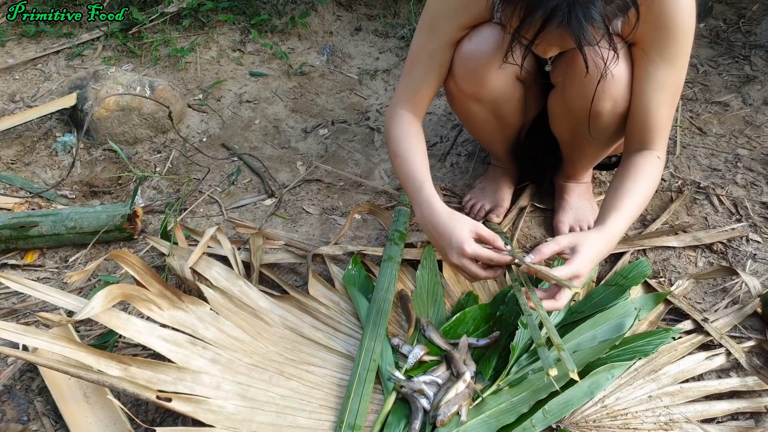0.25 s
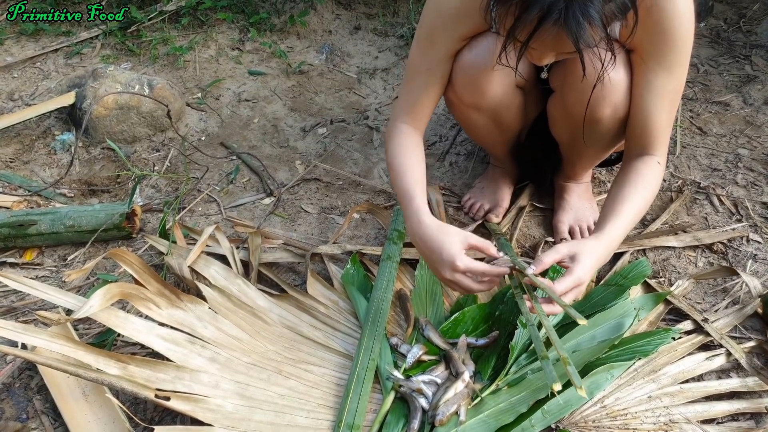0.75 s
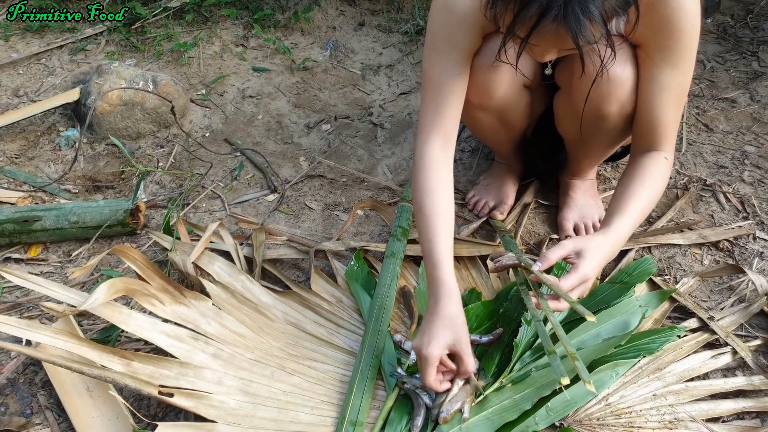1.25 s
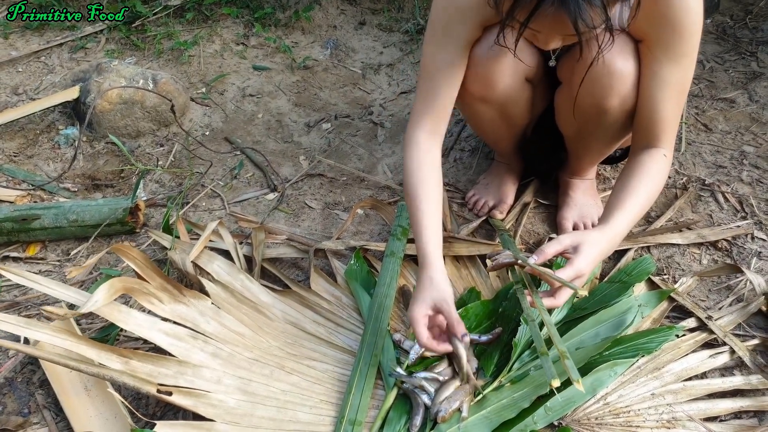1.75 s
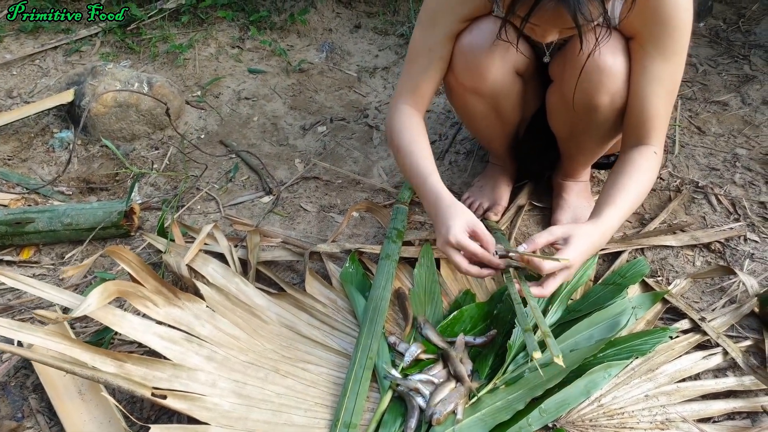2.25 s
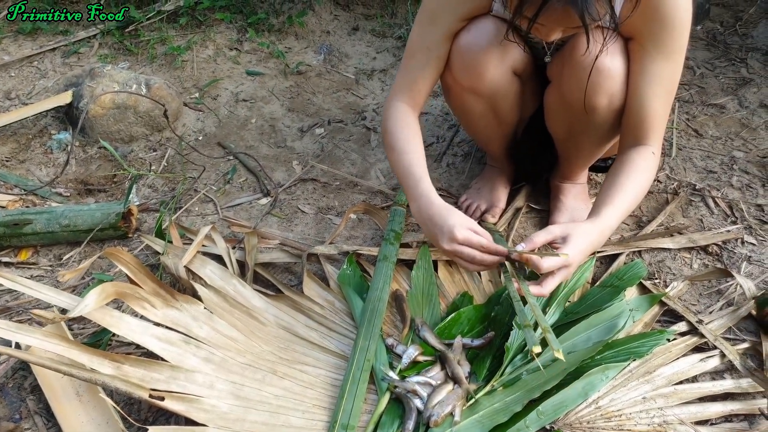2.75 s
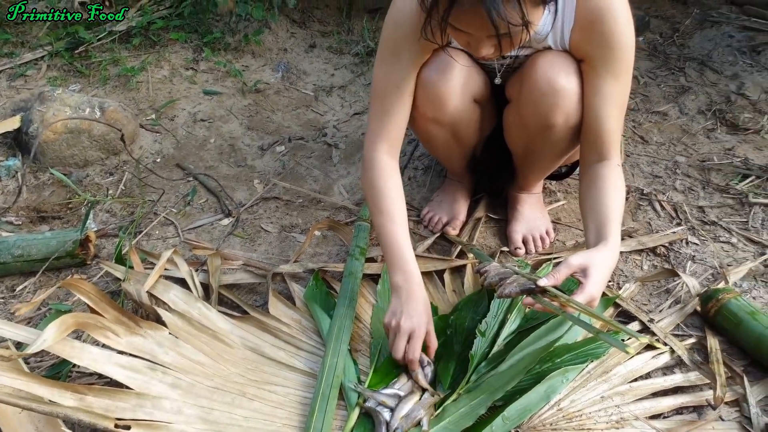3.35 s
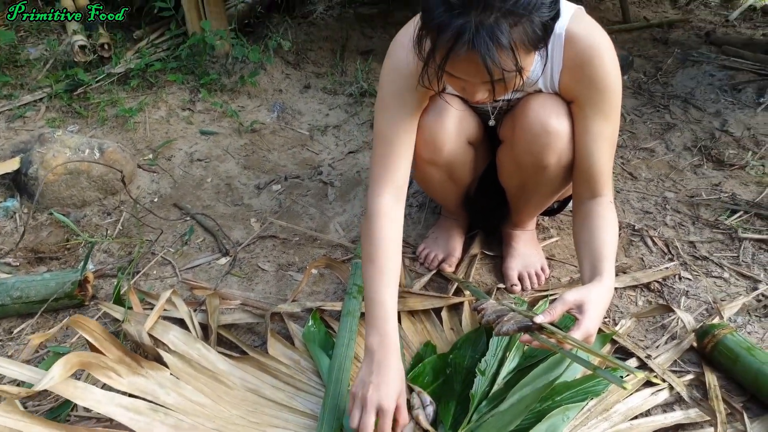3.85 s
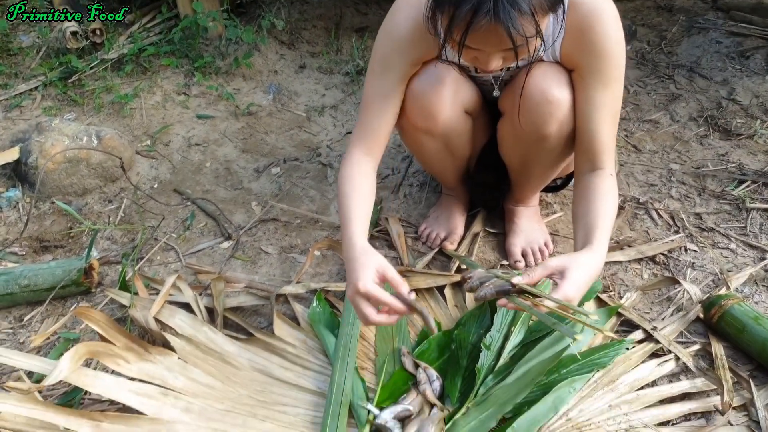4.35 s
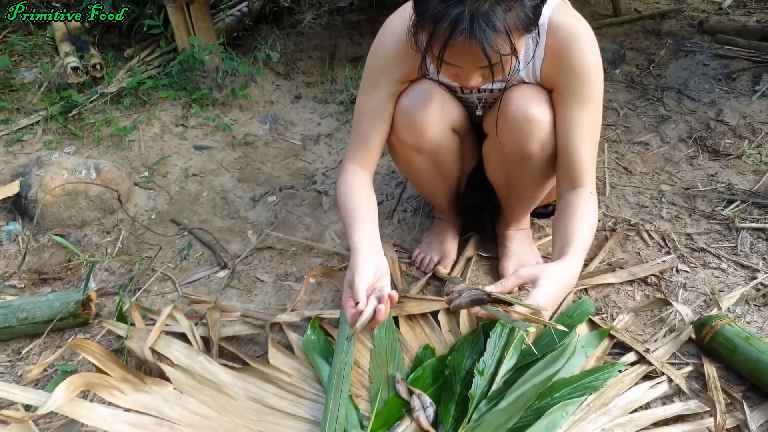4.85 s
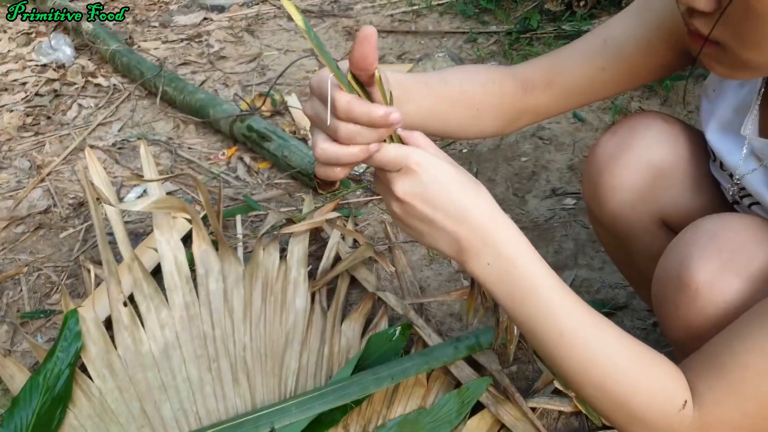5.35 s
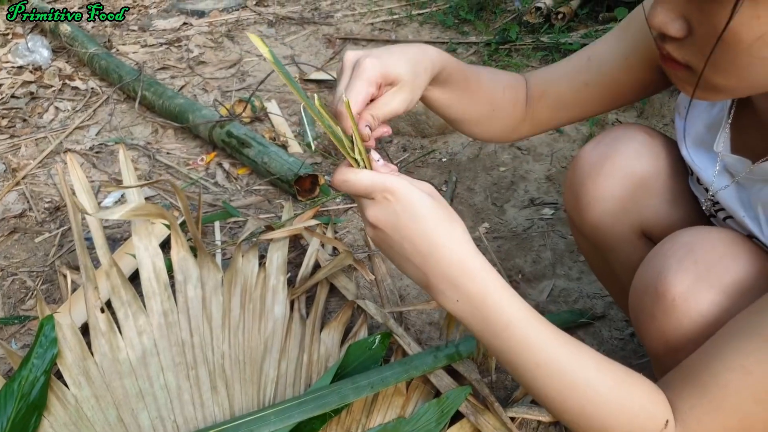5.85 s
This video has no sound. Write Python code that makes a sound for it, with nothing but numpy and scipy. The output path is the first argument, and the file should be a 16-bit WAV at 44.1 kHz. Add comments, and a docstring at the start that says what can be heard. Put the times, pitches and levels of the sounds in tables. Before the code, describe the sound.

Steady high cicada hiss outdoors while hands rustle and knock among dry leaves; one sharp stick snap, a brief dropout, then quieter hiss.

```python
"""Cicadas over a quiet yard

Two kinds of cicada, clicks blurred into bands of hiss, sing far and near while hands sort food on dry
leaves: swelling noise bands and damped knocks. A stick snaps on the right in ringing modes and crackle,
and a leaf cracks likewise. A mains hum (a sine), light wind (low noise), still air (soft noise, slowly
changing in level) and a far bird (whistles) lie under it; the sound drops out for a moment and returns
quieter."""
import sys
import numpy as np
from scipy import signal
from scipy.fft import rfft, irfft, next_fast_len
from scipy.io import wavfile
from scipy.ndimage import uniform_filter1d

SR = 44100
rng = np.random.default_rng(int(sys.argv[2]) if len(sys.argv) > 2 else 0)


def dump(signal):
    """Clip the signal to [-1, 1] and save it as 16-bit WAV at the path in sys.argv[1]."""
    limited = np.clip(np.atleast_2d(signal).T, -1, 1)
    pcm = np.round(limited * 32767).astype(np.int16)
    wavfile.write(sys.argv[1], SR, pcm)


N = 269627

PORT_LAG_S = 0.00043  # the left port hears the near ground this much later
SNAP_RISE_S = 0.0007  # onset time of a fracture


def cicadas():
    """Incoherent superposition: two choruses, unrelated in the two ports, and two near singers."""
    # Slow swell of the choruses, stepping down at the dropout. Each row: time in seconds,
    # high chorus level in dB, its left-right difference in dB, low chorus level in dB, its difference in dB.
    chorus_curve = [(0, -46, 0.5, -49.5, -0.5), (2.8, -47, 3, -50, -2), (4.3, -47, 1, -48, -2.5),
                    (4.8, -44, -8.5, -47, -2), (5.05, -42.5, -5, -47.5, 0.5),
                    (5.08, -49, -0.5, -53.5, -2.5), (6.11, -49.5, -3.5, -54.5, -3)]
    # Song spectra of the high and low chorus. Each row: frequency in Hz, relative level in dB per Hz.
    high_song = [(7800, -45), (9000, -9), (10000, -3), (10500, -6), (11000, -5), (11500, -7.5),
                 (12000, -11.5), (13000, -20), (14000, -19.5), (14450, -32), (14700, -55)]
    low_song = [(4600, -72), (5400, -17.5), (6100, -8.5), (6900, -4.5), (7400, -1), (8000, -6),
                (8600, -3.5), (9500, -10.5), (10300, -17)]
    # Near singer on the right, swelling until the dropout. Each row: time in seconds, level in dB.
    right_curve = [(0, -49.5), (2.5, -49.5), (3.2, -45), (4.4, -42.5), (4.7, -42.5), (5.05, -42),
                   (5.08, -70), (6.11, -72)]
    # Its song spectrum. Each row: frequency in Hz, relative level in dB per Hz.
    right_song = [(9300, -29), (10200, -7.5), (10550, 5.5), (10900, 1), (11400, 0), (11900, -10),
                  (12300, -20), (12700, -8), (13300, -14), (14300, -32), (14700, -53)]
    # Low near singer on the left. Each row: time in seconds, level in dB.
    left_curve = [(0, -60), (.5, -51.5), (1.8, -53), (2.6, -50), (3.2, -54.5), (3.8, -57), (4.6, -75),
                  (6.11, -76)]

    high_db, high_pan, low_db, low_pan = follow(chorus_curve)
    high = singers(high_song, throb_db=0.5, swell_db=1.0, short_db=0.5, long_db=0.2)
    high = gain_of(high_db) * lean(high_pan) * high
    low = singers(low_song, throb_db=0.77, swell_db=-0.3, short_db=1.6, long_db=0.9)
    low = gain_of(low_db) * lean(low_pan) * low
    right = singers(right_song, throb_db=0.5, swell_db=2.6, short_db=-3.8, long_db=3.0)
    right = gain_of(follow(right_curve)[0]) * lean(-6.5)[:, None] * right
    left = gain_of(follow(left_curve)[0]) * lean(5.5)[:, None] * buzz()
    # unrelated ports add in power, so each chorus carries 3 dB more
    return np.sqrt(2) * (high + low) + right + left


def singers(song, throb_db, swell_db, short_db, long_db):
    """Shot noise: countless tymbal clicks blur into a band of hiss, uneven in time and pitch."""
    clicks_per_s = 30000
    clicks = rng.standard_normal((2, N)) * (rng.random((2, N)) < clicks_per_s / SR)
    hiss = uneven(coloured(clicks, song), short_db, long_db)
    return hiss * gain_of(throb_db * waver(0.028) + swell_db * waver(0.55))


def buzz():
    """Periodic buckling: a tymbal gives strong-weak pairs of decaying noise bursts at a drifting rate."""
    # Song spectrum of the low singer. Each row: frequency in Hz, relative level in dB per Hz.
    song = [(6000, -41), (6800, -9.5), (7200, -7.5), (7400, 1.5), (7650, -8), (8100, -4)]
    cycles_per_s, drift = 95.2, 0.002  # drift is a fraction of the rate
    ring_s, rebound, rebound_at = 0.0024, 0.35, 0.45  # decay time, weaker gain, place in the cycle
    turns = np.cumsum(cycles_per_s * (1 + drift * waver(0.36)[0])) / SR
    ring_turns = ring_s * cycles_per_s
    bursts = np.exp(-(turns % 1) / ring_turns)
    bursts = bursts + rebound * np.exp(-((turns - rebound_at) % 1) / ring_turns)
    noise = rng.standard_normal((2, N))
    return coloured(bursts * noise, song) * gain_of(0.42 * waver(0.052)[0])


def hands():
    """Friction noise: each movement swells a shuffling in a hollow of leaves and a grainy rustle."""
    # Movements of the hands. Each row: middle in seconds, length in seconds,
    # hollow shuffling level in dB, leaf rustle level in dB.
    movements = [(0.032, 0.21, -64, -75), (0.438, 0.36, -66.5, -64.5), (0.747, 0.59, -70, -76),
                 (1.55, 0.56, -75, -64), (1.92, 0.048, -69, -73), (2.22, 0.24, -92, -66.5),
                 (2.45, 0.27, -71, -88), (2.646, 0.2, -86, -66), (2.887, 0.61, -77, -71),
                 (3.514, 0.4, -63.5, -62.5), (4.25, 0.14, -63, -69), (4.717, 0.083, -68, -75),
                 (4.987, 0.24, -64.5, -74), (5.573, 1, -77, -67), (5.92, 0.2, -64.5, -74.5),
                 (6.05, 1, -73, -65.5)]
    # Spectra of hollow and rustle. Each row: frequency in Hz, relative level in dB per Hz.
    hollow_spectrum = [(200, -8.5), (350, -4.5), (570, 3), (750, -4), (1200, -13)]
    rustle_spectrum = [(700, -8), (1200, 6), (2200, 3.5), (3500, 7), (5000, 4.5), (7000, -43)]
    shuffling, rustling = gain_of(-74), gain_of(-71.5)  # the leaves between movements
    for middle, length, hollow_db, rustle_db in movements:
        rise = swell(middle, length)
        shuffling = shuffling + gain_of(hollow_db) * rise
        rustling = rustling + gain_of(rustle_db) * rise
    hollow = ports(hollow_spectrum, lambda hz: -1.5 + 0 * hz)
    rustle = ports(rustle_spectrum, lambda hz: -4.5 + 0 * hz)
    hollow = shuffling * gain_of(2.4 * waver(0.092)[0]) * hollow
    return hollow + rustling * gain_of(2.5 * waver(0.003)[0]) * rustle


def snap():
    """Brittle fracture: splinters crackle and ring a stick's modes; ground and leaves scatter a tail."""
    # The snap of a stick. Its one row: start in seconds, level in dB, left-right difference in the
    # treble in dB, relative crackle level in dB, relative tail level in dB.
    stick = (4.8301, -21.5, -12, 1.5, -11.5)
    # The break comes in steps. Each row: time from the start in seconds, relative level in dB.
    splinters = [(-.0009, -20), (0, 1), (.0014, -10), (.0036, 0), (.0066, -11), (.0083, -12), (.0255, -21)]
    # Modes of the stick. Each row: nominal frequency in Hz, relative level in dB, 60 dB decay in seconds.
    modes = [(139, -8, 0.063), (376, -15.5, 0.098), (496, -9.5, 0.059), (1080, -10.5, 0.06),
             (1930, -18.5, 0.053), (2180, -10, 0.023), (2744, -19, 0.064), (3190, -20, .02),
             (4090, -6.5, 0.021), (4650, 0, 0.0099), (5060, 5, 0.0073), (5600, 4.5, 0.011),
             (6470, -6.5, 0.02)]
    # Spectra of crackle and scattered tail. Each row: frequency in Hz, relative level in dB per Hz.
    crackle_spectrum = [(100, -5), (1460, -5.5), (2180, -4), (3320, 1), (5480, -5), (7670, -19),
                        (11200, 0.5), (15000, -18)]
    scatter_spectrum = [(100, -32), (150, -4.5), (450, -5.5), (570, -7), (885, -13.5), (1500, -9.5),
                        (2220, -5), (2850, -7.5), (5600, -4), (6600, -12.5), (9000, -25)]
    crackle_t60_s = 0.006
    rise_turns = 1.45  # a mode takes this many cycles to build up, beyond the onset
    shadow_hz = 1500  # lower tones bend round the microphone and reach both ports alike

    out, t = np.zeros((2, N)), np.arange(12000) / SR
    s, db, pan, crackle_db, tail_db = stick
    for delay, step_db in splinters:
        crackle = coloured(rng.standard_normal(len(t)), crackle_spectrum)
        crackle = crackle * gain_of(db + step_db + crackle_db - 60 * t / crackle_t60_s)
        add(out, s + delay, crackle * np.minimum(t / SNAP_RISE_S, 1), pan)
        for hz, mode_db, t60 in modes:
            tone = np.sin(2 * np.pi * hz * rng.uniform(0.97, 1.01) * t)
            ring = gain_of(db + step_db + mode_db - 60 * t / t60) * tone
            onset = np.minimum(t / (SNAP_RISE_S + rise_turns / hz), 1)
            add(out, s + delay, ring * onset, pan * hz / (hz + shadow_hz))

    lumps = gain_of(0.65 * waver(0.00049)[:, :len(t)] + 1.36 * waver(0.0011)[0, :len(t)])
    fading = gain_of(-60 * t / 0.19) + gain_of(-11 - 60 * t / 0.55)  # early and late decay
    fading = fading * np.minimum(t / 0.017, 1)
    tail = lumps * coloured(rng.standard_normal((2, len(t))), scatter_spectrum) * fading
    out[:, round(s * SR):][:, :len(t)] += tail * gain_of(db + tail_db) * lean(pan / 2)[:, None]
    return out


def leaf():
    """Modal excitation: each crack rings a stiff leaf and crackles; a short rustle follows the first."""
    # The leaf cracks in steps. Each row: start in seconds, level in dB.
    cracks = [(3.5508, -33.5), (3.5542, -38.5), (3.572, -48), (3.582, -50)]
    # Modes of the leaf. Each row: nominal frequency in Hz, relative level in dB, 60 dB decay in seconds.
    modes = [(1920, -3.5, 0.049), (2460, -3.5, .015), (3600, -7, 0.018), (4550, -9, 0.013), (5500, 0, .015)]
    # Spectrum of crackle and rustle. Each row: frequency in Hz, relative level in dB per Hz.
    noise_spectrum = [(1300, -25), (1900, -6), (3100, -4), (4500, -5), (6500, -2), (9000, -18)]
    lean_db, crackle_db = -6.5, -3
    rustle_db, rustle_t60_s = -46.5, 0.26

    out, t = np.zeros((2, N)), np.arange(6000) / SR
    for s, db in cracks:
        ring = np.zeros(len(t))
        for hz, mode_db, t60 in modes:
            tone = np.sin(2 * np.pi * hz * rng.uniform(0.99, 1.01) * t)
            ring += gain_of(mode_db - 60 * t / t60) * tone
        crackle = coloured(rng.standard_normal(len(t)), noise_spectrum)
        crackle = crackle * gain_of(crackle_db - 60 * t / 0.012)
        add(out, s, gain_of(db) * (ring + crackle) * np.minimum(t / SNAP_RISE_S, 1), lean_db)
    fading_db = rustle_db - 60 * t / rustle_t60_s + 1.5 * waver(0.0018)[0, :len(t)]
    rustle = coloured(rng.standard_normal(len(t)), noise_spectrum) * gain_of(fading_db)
    add(out, cracks[0][0], rustle * np.minimum(t / 0.0066, 1), lean_db)
    return out


def knocks():
    """Damped oscillation: each knock or tick is a decaying ring at its pitch inside a puff of noise."""
    # Small knocks and ticks. Each row: start in seconds, level in dB, pitch in Hz,
    # left-right difference in dB, 60 dB decay in seconds.
    strokes = [(0.422, -49, 610, -4, 0.078), (0.939, -50.5, 96, -7, 0.18), (1.634, -53, 3580, -14, 0.083),
               (1.661, -53, 3320, -13, 0.048), (2.151, -51, 2700, -6, 0.03), (2.156, -58, 970, -6, .06),
               (2.231, -53, 3360, -13, .04), (2.612, -55, 2480, -1, .05), (2.619, -55, 970, 0, .05),
               (2.856, -48, 596, 0, 0.066), (2.95, -49, 800, 3, 0.024), (3.473, -44, 840, -17, 0.019),
               (3.514, -39, 1300, -3, .016), (3.76, -49.5, 456, -2, 0.038), (3.872, -49, 2520, -13, 0.032),
               (3.917, -53, 2580, -5, .02), (3.918, -36, 900, -6, 0.025), (4.028, -45, 596, 3, 0.049),
               (4.492, -58, 268, -21, 0.027), (4.647, -59, 334, -15, 0.09), (4.677, -53, 444, -12, 0.027),
               (4.71, -55, 350, -27.5, 0.12), (4.716, -56.5, 1260, -18, 0.061),
               (4.718, -59, 2520, -15, .04), (4.725, -56, 1870, -14, .04), (4.778, -46, 126, -17, 0.051),
               (4.848, -41, 126, -11, 0.056), (4.876, -42, 607, 5, 0.061), (4.951, -50, 560, -3, 0.077),
               (4.994, -48.5, 163, -19, 0.051), (5.846, -53.5, 460, -9, 0.092), (5.914, -51, 65, 17, 0.07),
               (5.925, -48, 680, -9, 0.045), (5.93, -48, 406, 3, 0.071), (5.981, -52, 98, 14, 0.076)]
    noisy_hz = 2000  # knocks above this pitch are mostly noise
    out, t = np.zeros((2, N)), np.arange(6000) / SR
    for s, db, hz, pan, t60 in strokes:
        puff = coloured(rng.standard_normal(len(t)), [(hz / 3.9, -25), (hz, 0), (hz * 2.5, -25)])
        ring = np.sin(2 * np.pi * hz * t) / (1 + (hz / noisy_hz) ** 2)
        envelope = gain_of(db - 60 * t / max(t60, 0.01)) * np.minimum(t / 0.0011, 1)
        add(out, s, envelope * (0.57 * puff + 0.74 * ring), pan)
    return out


def peeps():
    """Frequency modulation: a far bird's short soft whistles waver a little in pitch."""
    # Faint peeps. Each row: middle in seconds, length in seconds, level in dB, mean pitch in Hz.
    whistles = [(0.525, 0.11, -68, 2540), (0.61, 0.075, -70, 2500), (.73, 0.066, -69, 2560),
                (3.497, .03, -62, 2650), (3.752, .03, -69, 2530), (4.025, .045, -66.5, 2520)]
    turns_per_hz = np.cumsum(1 + 0.0077 * waver(0.007)[0]) / SR
    out = np.zeros(N)
    for middle, length, db, hz in whistles:
        tone = np.sqrt(2) * np.sin(2 * np.pi * hz * turns_per_hz)
        out += gain_of(db) * swell(middle, length) * tone
    return out * lean(-2.5)[:, None]


def wind():
    """Turbulent pressure: lumpy low noise, different at each port, forms a breeze with gusts."""
    # Gusts on the microphone. Each row: middle in seconds, length in seconds, level in dB,
    # left-right difference in dB.
    gusts = [(0.01, 0.16, -59.5, -23), (0.946, 0.24, -76, -8), (3.152, 1, -65.5, -6), (4.102, 0.32, -68, 7),
             (4.5, 0.086, -65, -22), (4.666, 0.33, -63, -15), (4.833, 0.28, -52, -10),
             (5.031, 0.097, -63, -17.5), (5.955, 0.28, -64, 15), (6.09, 0.13, -66, 5)]
    # Spectrum of the wind. Each row: frequency in Hz, relative level in dB per Hz.
    spectrum = [(20, -57), (40, -4), (65, -2), (110, -18.5), (180, -24.5), (300, -37)]
    level = gain_of(-75.5) * lean(-0.5)[:, None]  # the breeze between gusts
    for middle, length, db, pan in gusts:
        level = level + gain_of(db) * lean(pan)[:, None] * swell(middle, length)
    pressure = coloured(rng.standard_normal((2, N)), spectrum)
    return np.sqrt(2) * level * gain_of(2.5 * waver(0.082)) * pressure


def hum():
    """Amplitude modulation: a mains tone of steady pitch wavers in strength."""
    # Strength of the hum. Each row: time in seconds, level in dB.
    strength = [(0, -59.5), (0.9, -58.5), (1.25, -62), (2.1, -61.5), (2.6, -59), (3.2, -57), (3.7, -60),
                (5.04, -59), (5.08, -64.5), (5.65, -68.5), (6.11, -69)]
    hum_hz = 50.2
    turn = 2 * np.pi * hum_hz * np.arange(N) / SR
    level = gain_of(follow(strength)[0] + 0.87 * waver(0.053)) * lean(-7)[:, None]
    return level * np.sqrt(2) * np.sin(turn + np.array([[-0.35], [0]]))  # left phase lags, in radians


def still_air():
    """Partial coherence: a soft background hiss that the ports share differently in each band."""
    # Spectrum of the still air. Each row: frequency in Hz, relative level in dB per Hz.
    spectrum = [(59, -12), (100, 0), (206, -8), (395, -10.5), (582, -10), (1010, -8), (2150, -9.5),
                (2460, -9), (3930, -10.5), (5500, -1), (7150, -51)]
    # Its balance. Each row: frequency in Hz, left-right difference in dB.
    balance = [(60, -28), (130, -1), (290, -3.5), (630, 3), (1390, -1.5), (2400, -2.5), (3300, -7),
               (4500, -6), (6720, 7.5)]
    # Its slow change. Each row: time in seconds, change of level in dB, left-right difference in dB.
    drift = [(0, 0.5, -1), (3.4, 0.5, 1), (4.2, -0.5, 1), (5.05, -2, -1.5), (5.08, 1.5, 1.5), (6.11, 0, 1)]
    drift_db, drift_pan = follow(drift)
    hiss = uneven(ports(spectrum, lambda hz: read(balance, hz)), short_db=3.17, long_db=0)
    return gain_of(-60.5 + drift_db) * lean(drift_pan) * hiss


def ports(spectrum, lean_db):
    """Partial coherence: noise that the two ports partly share, the shared part later on the left."""
    # Likeness of the two ports. Each row: frequency in Hz, shared fraction of amplitude (0 to 1).
    likeness = [(100, 0.88), (300, 1), (700, 0.054), (2000, 0.28), (5000, 0.37)]
    size = next_fast_len(N)
    hz = np.fft.rfftfreq(size, 1 / SR)
    right, other = rfft(rng.standard_normal((2, size)))
    same = np.clip(read(likeness, hz), 0, 1)
    delayed = right * np.exp(-2j * np.pi * hz * PORT_LAG_S)
    left = same * delayed + np.sqrt(1 - same ** 2) * other
    return coloured(irfft(np.array([left, right]) * lean(lean_db(hz)), size), spectrum)[:, :N]


def add(mix, s, sound, pan_db):
    """Time and level difference: places a near sound in both ports, later on the left."""
    for out, gain, at in zip(mix, lean(pan_db), (s + PORT_LAG_S, s)):
        part = out[round(at * SR):][:len(sound)]
        part += gain * sound[:len(part)]


def uneven(x, short_db, long_db):
    """Time-frequency modulation: narrow bands of a hiss rise and fall over short and long spans, rms 1."""
    z = signal.stft(x, nperseg=1024, noverlap=512)[2]

    def chance(bands, frames):
        """Local averaging: chance smoothed over neighbouring bands and frames, rms 1."""
        rough = uniform_filter1d(rng.standard_normal(z.shape), size=bands, axis=1)
        return evened(uniform_filter1d(rough, size=frames, axis=2))

    gain = gain_of(short_db * chance(3, 6) + long_db * chance(2, 60))
    return evened(signal.istft(z * gain, nperseg=1024, noverlap=512)[1][:, :N])


def coloured(x, spectrum):
    """Linear filtering: gives x a spectrum, silent outside the table, rms 1."""
    size = next_fast_len(x.shape[-1])
    hz = np.fft.rfftfreq(size, 1 / SR)
    inside = (hz >= spectrum[0][0]) * (hz <= spectrum[-1][0])
    gain = gain_of(read(spectrum, hz)) * inside
    return evened(irfft(rfft(x, size) * gain, size)[..., :x.shape[-1]])


def waver(seconds):
    """Low-pass noise: slow chance for each port, rms 1."""
    width = max(int(seconds * SR), 1)
    return evened(uniform_filter1d(uniform_filter1d(rng.standard_normal((2, N)), width), width))


def swell(middle, length):
    """Raised-cosine envelope: a smooth rise and fall of height 1."""
    return np.cos(np.pi * np.clip((np.arange(N) / SR - middle) / length, -0.5, 0.5)) ** 2


def follow(table):
    """Linear interpolation: returns each column of a time table sample by sample."""
    s, *columns = np.transpose(table)
    return [np.interp(np.arange(N) / SR, s, c) for c in columns]


def read(points, hz):
    """Logarithmic pitch scale: reads a spectrum table on a log-frequency axis."""
    f, value = np.transpose(points)
    return np.interp(np.log(hz + 1), np.log(f + 1), value)


def lean(pan_db):
    """Level difference: left and right gains, half the decibels up on one side and down on the other."""
    return gain_of(np.array([pan_db / 2, -pan_db / 2]))


def evened(x):
    """Power normalisation: scales to rms 1."""
    return x / np.sqrt(np.mean(x ** 2) + 1e-20)


def gain_of(db):
    """Logarithmic level: decibels to amplitude."""
    return 10 ** (np.asarray(db) / 20)


def scene():
    """Superposition: all sources add at the two ports."""
    near = cicadas() + hands() + snap() + leaf() + knocks()
    return near + peeps() + wind() + hum() + still_air()


def record(dry):
    """Gating and band limiting: the level falls to a trace, vanishes and comes back; then a low-pass."""
    drop_s, silent_s, return_s, edge_s = 5.0445, 5.062, 5.0785, 0.002
    trace_db, silent_db = -16, -50
    steps = [(drop_s, 0), (drop_s + edge_s, trace_db), (silent_s - edge_s, trace_db),
             (silent_s, silent_db), (return_s - 2 * edge_s, silent_db), (return_s, 0)]
    cut = dry * gain_of(follow(steps)[0])
    low_pass = signal.firwin(511, 15350, window=("kaiser", 9), fs=SR)  # edge in Hz
    return signal.oaconvolve(cut, low_pass[None], "same")


dry = scene()
out = record(dry)
dump(out)
```